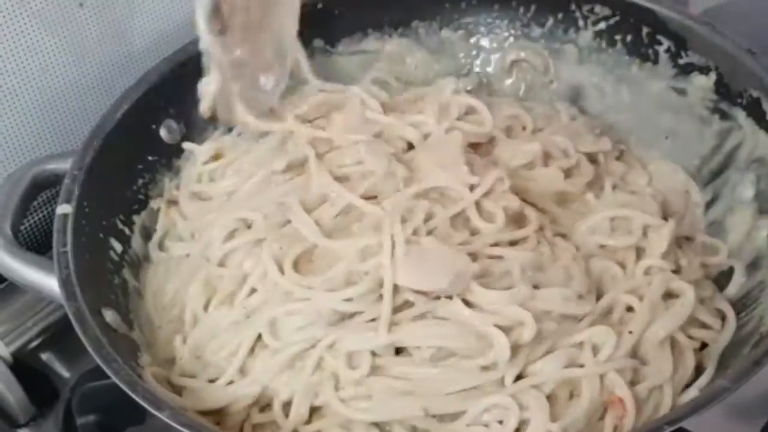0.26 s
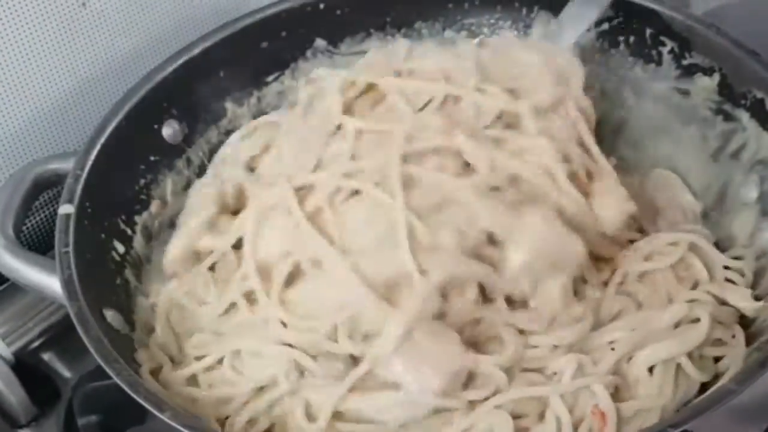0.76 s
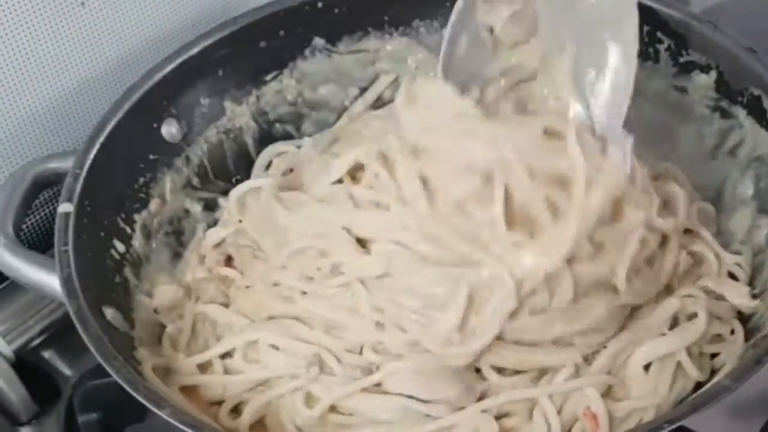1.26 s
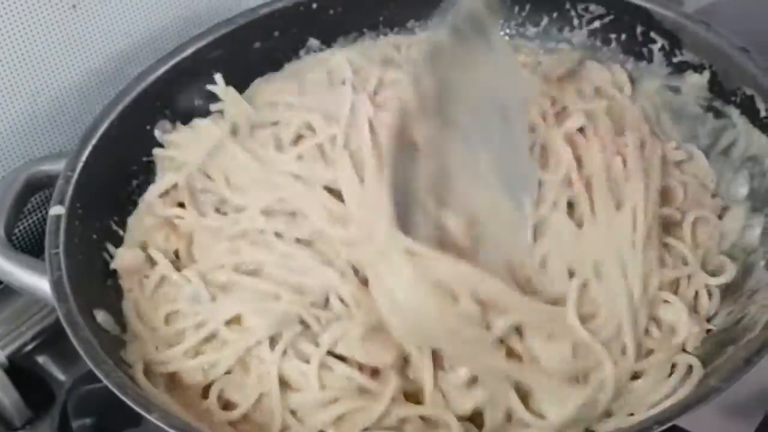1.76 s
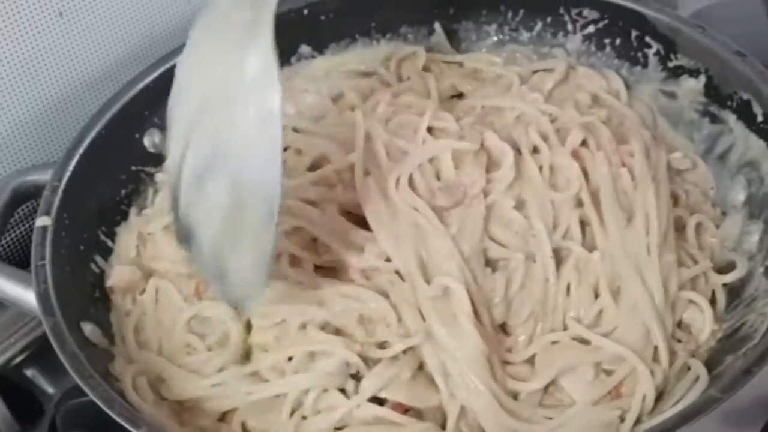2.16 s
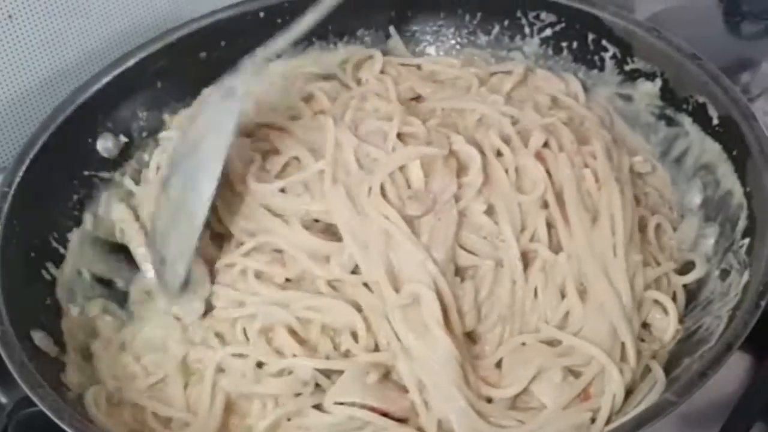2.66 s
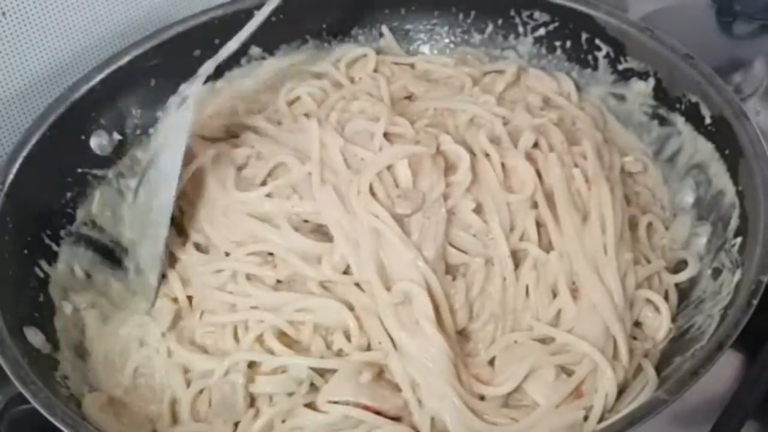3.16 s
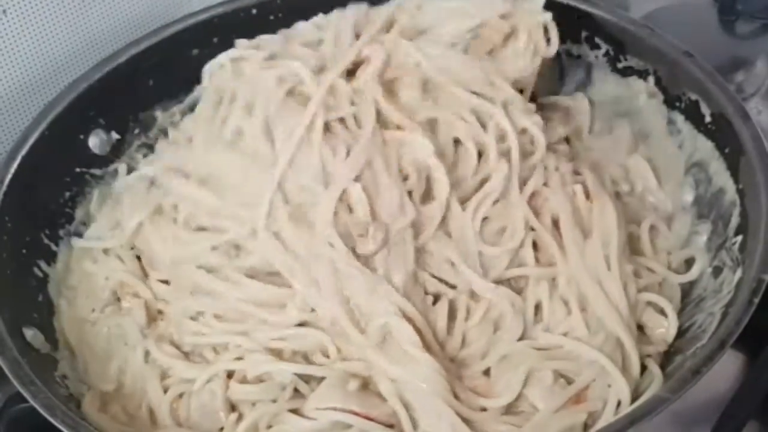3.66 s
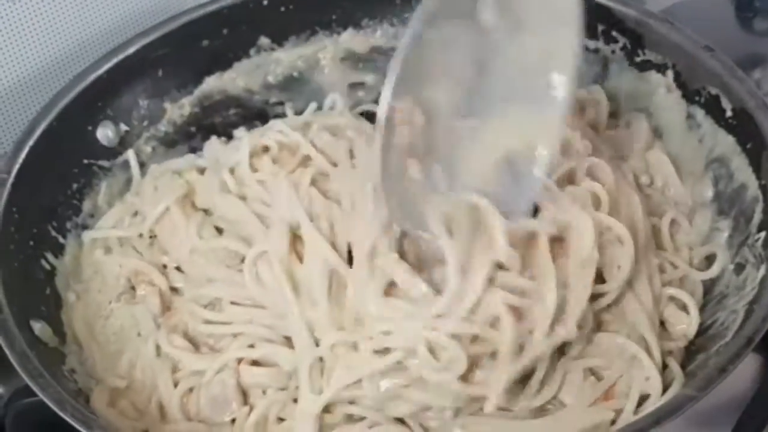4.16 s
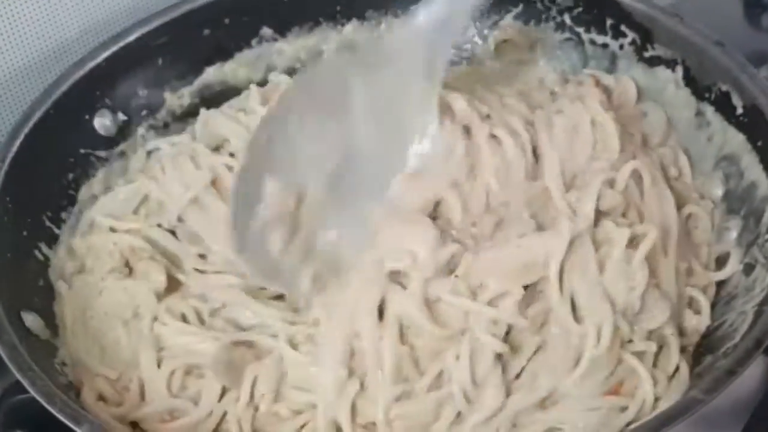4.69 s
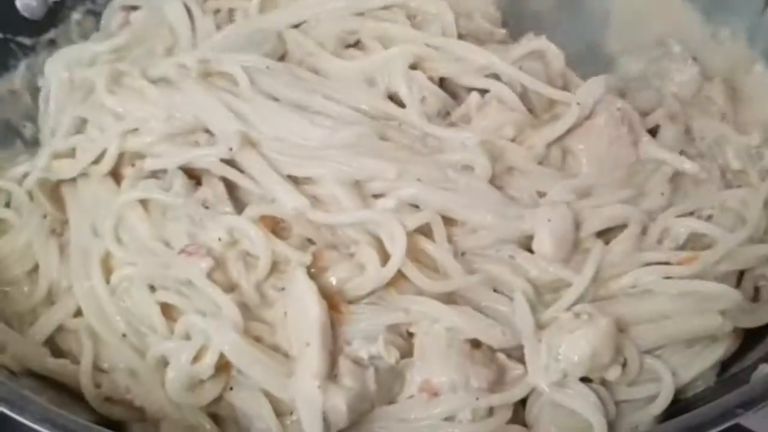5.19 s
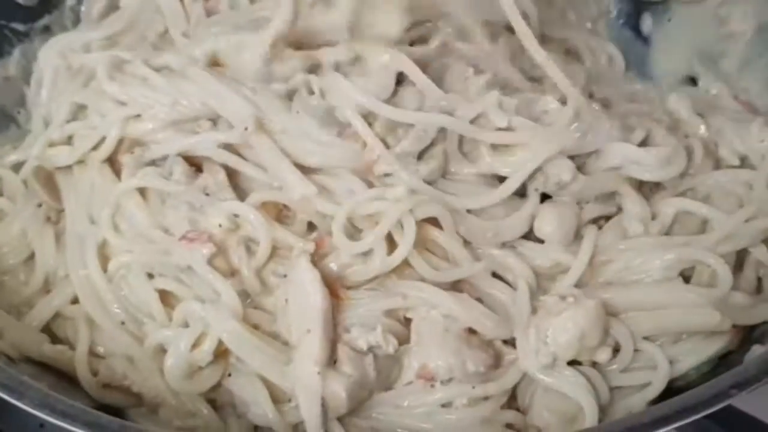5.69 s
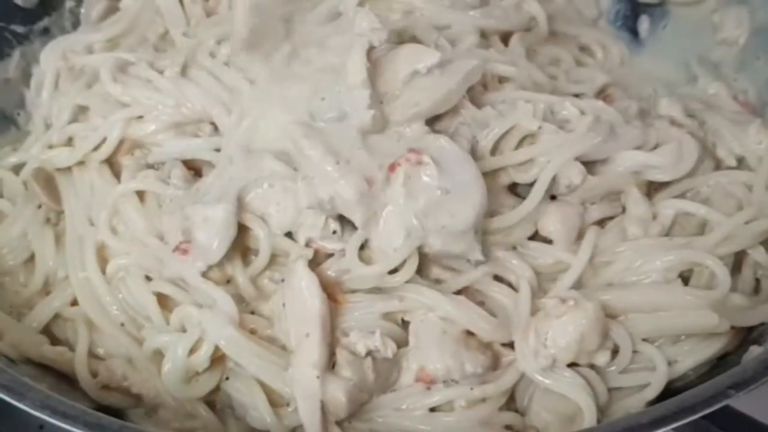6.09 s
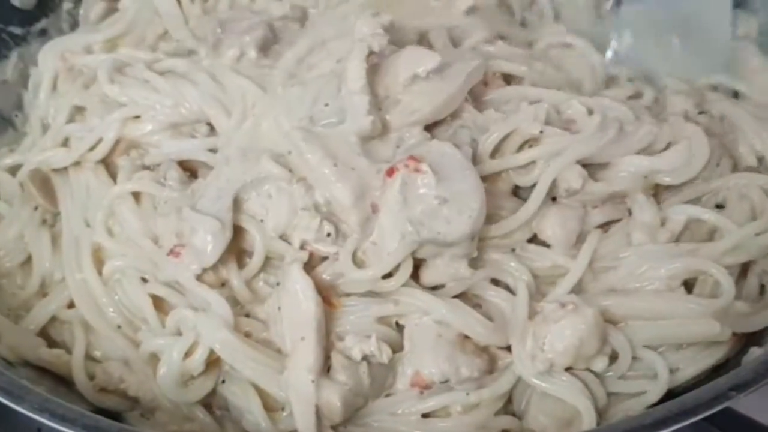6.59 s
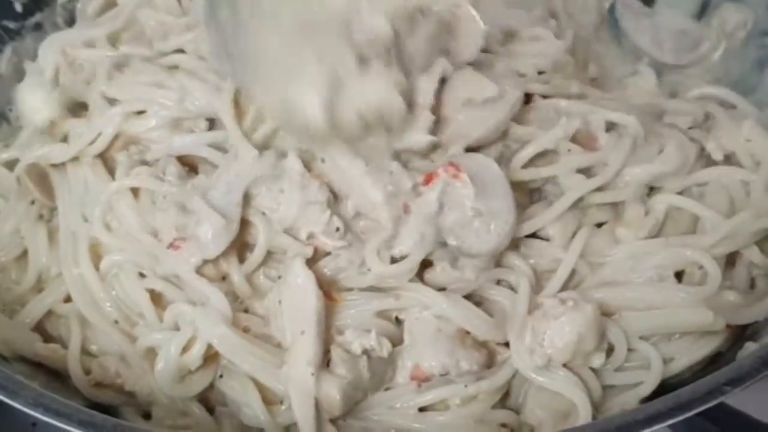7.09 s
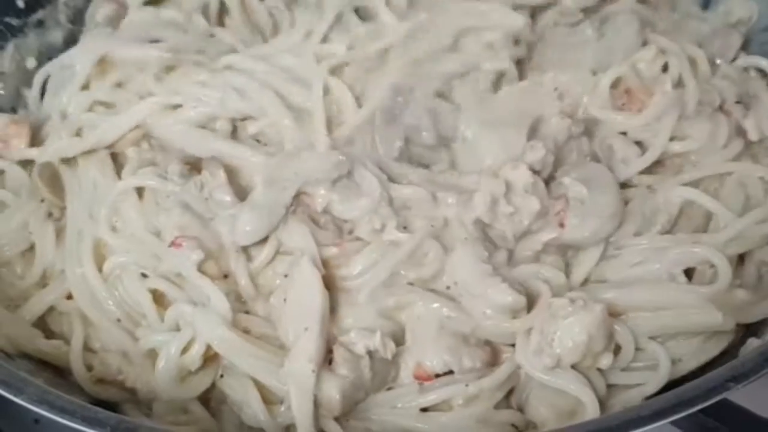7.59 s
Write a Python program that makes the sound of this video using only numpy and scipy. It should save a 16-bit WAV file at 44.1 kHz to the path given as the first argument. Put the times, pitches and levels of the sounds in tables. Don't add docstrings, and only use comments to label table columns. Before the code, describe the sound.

A spatula knocks, scrapes and rubs a nonstick pan while saucy pasta squelches softly and slaps, over a faint fridge hum in a small kitchen.

```python
import sys
import numpy as np
from scipy import signal
from scipy.fft import rfft, irfft, next_fast_len
from scipy.io import wavfile
from scipy.ndimage import uniform_filter1d

SR = 44100
rng = np.random.default_rng(int(sys.argv[2]) if len(sys.argv) > 2 else 0)


def level_to_linear(level):
    exponent = np.asarray(level, float) / 20
    return 10 ** exponent


def pcm_store(signal):
    levels = np.round(np.clip(np.atleast_2d(signal), -1, 1) * 32767)
    wavfile.write(sys.argv[1], SR, levels.astype(np.int16).T)


N = 346185
T = np.arange(N) / SR

# start in seconds, level in dB, bowl over rasp in dB, thud over rasp in dB.
KNOCKS = [(0.444, -22.5, -3, -9), (2.836, -17.5, 4, -2.5), (2.8694, -53.5, -4, 24), (3.1089, -26, -9, -8),
          (3.1225, -29, -5, -2), (3.377, -42, 5, -22), (3.42, -42, 8.5, -5), (3.518, -60, 1, -7),
          (4.349, -32.5, 4, 4.5), (4.9549, -25, -13, -18), (5.208, -44.5, 12, -2), (5.257, -53, -3, 0),
          (6.572, -46.5, 2, -2), (6.6693, -27.5, -4, -11.5)]
# start in seconds, level in dB, weight on the bowl in dB, fall T60 in seconds.
SWIPES = [(0.08, -32.5, -9.5, 0.41), (.35, -52, -20, .17), (0.471, -36.5, -1.5, 0.42),
          (1.66, -42, 6.5, 0.16), (1.99, -50.5, -16, 0.59), (2.31, -54.5, -14, 0.49),
          (2.611, -39.5, -5.5, 0.18), (2.832, -36, -3, 0.13), (3.108, -36, -3, 0.31),
          (3.271, -44.5, 2.5, 0.72), (3.324, -38, -5.5, 0.32), (3.396, -38.5, 2, 0.095),
          (3.55, -64.5, 15, 0.15), (4.345, -44, -5, 0.33), (5.21, -47, -1, 0.47), (5.415, -47, -15, 0.26),
          (5.44, -29.5, -1, 0.068), (6.651, -54.5, -2.1, 0.29), (6.72, -47, -1, 0.16),
          (7.498, -45.5, -31, 0.25)]
# peak in seconds, level in dB, weight on the bowl in dB, swell in seconds.
STROKES = [(1.627, -38, -3.5, 0.032), (2.76, -58, 6.5, 0.1), (2.95, -54.5, 7.5, 0.09),
           (3.49, -54, 5.5, 0.059), (4.72, -49.5, -19, 0.034), (5.029, -41.5, 4, 0.063),
           (5.087, -37, 1, 0.05), (5.126, -39.5, -2.5, 0.02), (5.375, -38, -2, 0.034),
           (5.48, -47, -2, 0.03), (7.14, -52.5, -9, 0.18)]
# start in seconds, level in dB, mode in Hz, T60 in seconds.
SPOT_BLOWS = [(0.4452, -14, 1260, 0.0033), (.474, -23.5, 2316, 0.021), (2.6, -33.5, 345, 0.094),
              (2.837, -22, 367, 0.069), (4.349, -28, 580, 0.0081), (4.955, -24, 378, 0.036),
              (5.258, -26.5, 266, 0.026), (5.426, -16, 1170, 0.031), (5.433, -8, 1200, 0.038)]
# start in seconds, level in dB, mode in Hz, length in seconds.
SPOT_RUBS = [(.575, -42, 1070, 0.029), (0.653, -44.5, 1014, 0.033), (.76, -47, 563, 0.069),
             (1.645, -39, 994, 0.037), (2.698, -46, 2470, 0.093), (2.71, -50, 3580, .11),
             (2.72, -49, 2160, 0.097), (2.86, -25, 120, 0.02), (2.88, -50, 3650, 0.19),
             (2.94, -33, 105.4, .02), (3.108, -23.5, 337, 0.02), (3.26, -33, 1043, .075),
             (3.385, -28.5, 1300, 0.032), (3.391, -25.5, 2310, 0.012), (3.436, -44, 3490, .05),
             (3.538, -38, 1043, 0.0089), (3.598, -48.5, 650, .08), (4.992, -37, 1017, 0.14),
             (5.012, -33, 2730, 0.019), (5.029, -31, 485, 0.026), (5.058, -31, 2430, 0.088),
             (5.09, -44, 1320, 0.025), (5.11, -36, 2290, .033), (5.344, -30, 2093, .038),
             (5.37, -32, 1530, .012), (5.461, -37.5, 1194, 0.018), (5.47, -31, 231, 0.034),
             (5.505, -44.5, 1230, 0.12), (6.701, -43, 793, .09), (7.198, -35.5, 3260, 0.0064)]
# start in seconds, level in dB, pitch in Hz, T60 in seconds.
TAPS = [(.4535, -27, 1100, .012), (0.462, -23, 1200, .015), (.473, -25.5, 1100, 0.023),
        (.484, -31, 1150, .03), (.797, -46, 657, 0.033), (.864, -45, 654, .025), (2.846, -14, 900, .012),
        (3.111, -22, 330, .025), (3.113, -25, 1100, 0.016), (3.122, -28, 1150, .025),
        (3.127, -21.5, 380, 0.027), (3.264, -39, 1060, .03), (3.296, -33, 1030, 0.035),
        (3.316, -33, 1040, .04), (3.328, -36, 420, 0.034), (3.381, -28, 1120, 0.011),
        (3.401, -27.5, 1250, .012), (3.42, -30, 1110, 0.011), (3.429, -32, 1200, .01),
        (3.488, -42, 1090, .03), (3.518, -35.5, 2500, .01), (4.349, -16.5, 450, 0.015),
        (4.355, -26, 900, 0.011), (4.372, -26.5, 300, 0.018), (4.962, -31, 1050, .02),
        (4.992, -34, 400, .02), (5.018, -33, 880, .03), (5.036, -28, 1100, 0.017), (5.038, -33, 1600, .02),
        (5.068, -30, 1050, .025), (5.087, -28, 1450, 0.017), (5.209, -30, 900, .01),
        (5.358, -29.5, 2200, .02), (5.368, -25, 2060, .015), (5.378, -24.5, 4300, .01),
        (5.433, -20.5, 700, 0.019), (5.4435, -15, 1200, .022), (5.467, -28, 1200, 0.045),
        (5.476, -28, 1200, .03), (5.51, -36.5, 1200, .04), (.4455, -18, 500, .008), (1.6, -39, 900, .015),
        (1.625, -38, 1000, .015), (1.652, -33, 800, 0.018), (1.659, -34, 1690, .02), (1.671, -31, 950, .02),
        (1.684, -36, 700, .015), (5.045, -29, 480, .025), (6.668, -29, 910, 0.017),
        (7.2005, -39, 3280, .012)]
# frequency in Hz, level in dB, T60 in seconds.
THUD_MODES = [(123, -3, 0.45), (245.7, -1, 0.12), (378, -2, 0.022), (473.6, -7.5, 0.11), (615, -12, 0.046)]
# frequency in Hz, level in dB, T60 in seconds.
BOWL_MODES = [(840, -11, 0.14), (930, -9, 0.053), (1082, -6.5, 0.034), (1170, -5.5, 0.018),
              (1330, -15.5, 0.16), (1447, -10.5, 0.11), (1598, -10.5, 0.093), (1814, -14, 0.086),
              (1985, -13.5, 0.054)]
# frequency in Hz, level in dB, T60 in seconds.
RASP_MODES = [(2300, -14, 0.18), (2470, -9, 0.18), (2780, -8.5, 0.07), (3560, -13, 0.059),
              (4140, -12, 0.04), (4890, -11.5, 0.061), (5200, -5, 0.018), (5830, -8.5, .04),
              (6200, -7, 0.022), (6790, -11, 0.099)]
# frequency in Hz, density in dB per Hz.
GRIT_SPECTRUM = [(880, -13.5), (1500, -17), (1700, -19.5), (1850, -5.5), (3990, -8), (6530, -4.5),
                 (8850, -13), (13100, -13), (14500, -32)]
# time in seconds, pitch in Hz, level in dB, pitch wander from 0 to 1.
SQUEAK = [(2.86, 915, -80, .02), (2.9, 920, -58, .03), (2.97, 945, -55, .03), (3.05, 960, -56, .03),
          (3.1, 965, -62, .02), (3.185, 920, -66, .006), (3.2, 912, -45, .006), (3.29, 910, -48, .006),
          (3.32, 905, -80, .006)]
# level in dB, from the fundamental up.
SQUEAK_HARMONICS_DB = [-11, 0, -15, -13]
# time in seconds, stirring level in dB.
STIRRING = [(0.0, -57.5), (0.7, -56.5), (1.2, -61), (1.64, -53), (2.21, -64), (2.75, -63.5), (3.3, -59.5),
            (3.55, -58), (4.25, -62), (4.5, -54), (4.8, -65.5), (5.12, -56.5), (5.31, -50), (5.68, -63),
            (6.43, -65), (6.82, -48), (7.2, -48), (7.33, -61)]
# frequency in Hz, density in dB per Hz.
WET_SPECTRUM = [(590, -33), (1000, -1), (1320, -6), (1670, -2), (1870, -2.5), (3790, -1), (8860, -4.5),
                (11600, -1.5), (14500, -5.5)]
# start in seconds, level in dB, pitch in Hz.
TICKS = [(0.748, -42.5, 6300), (0.819, -42, 5770), (0.8426, -36, 4540), (0.9894, -47, 7790),
         (1.109, -52, 6370), (1.3526, -40, 6330), (1.422, -45, 9330), (1.7295, -42, 3050),
         (1.7687, -37, 8400), (1.98, -45, 3350), (2.294, -40.5, 10530), (2.349, -43, 9250),
         (3.264, -42, 5600), (3.929, -43.5, 9760), (4.2572, -46, 5670), (4.2832, -40, 6700),
         (4.4185, -40, 6310), (4.562, -41, 3940), (4.589, -42, 4330), (5.675, -38.5, 10800),
         (6.0247, -44, 5980), (6.103, -43, 6160), (6.4625, -45, 11000), (4.284, -40, 11800),
         (6.9713, -37, 7800), (7.201, -31.5, 3180), (7.2694, -39, 5300), (7.457, -38, 6250),
         (7.504, -39, 2560), (7.7189, -43.5, 6200)]
# start in seconds, level in dB.
KNOCK_CRACKS = [(2.6, -28.5), (2.836, -28), (3.1083, -18.5), (4.3485, -31.5), (4.955, -21), (6.665, -44)]
# start in seconds, level in dB, centre in Hz, fade in seconds.
SWISHES = [(.068, -19.5, 6160, 0.046), (0.41, -43, 6400, .02), (1.61, -30.5, 5700, 0.028),
           (3.31, -35, 6000, .02), (5.36, -23.5, 3900, 0.016), (5.07, -29.5, 4100, 0.05),
           (7.495, -36.5, 11000, 0.025), (4.348, -25, 6000, 0.012), (3.11, -15.5, 6800, 0.012),
           (4.35, -32, 950, .014), (5.207, -39, 1300, 0.014), (.68, -38.5, 1300, 0.01),
           (1.6, -37, 350, 0.04)]
# start in seconds, level in dB, pitch
# in Hz.
NARROW_TICKS = [(.624, -46, 6080), (1.0526, -50, 4160), (1.1089, -46, 6450), (1.2267, -49, 11000),
                (1.295, -44, 3950), (1.3993, -50, 3330), (1.4227, -46, 5200), (1.4686, -51, 5040),
                (1.536, -43, 5790), (1.6098, -34, 5520), (1.635, -36, 3100), (1.6577, -38, 5500),
                (1.8443, -51, 3770), (1.9545, -49, 6930), (2.0049, -45, 3020), (2.1296, -50, 5000),
                (2.184, -47, 10900), (2.5956, -35, 7080), (2.6006, -32.5, 4800), (2.605, -36, 10800),
                (2.613, -36, 5600), (2.7133, -45, 5640), (2.836, -24, 5200), (3.3129, -31, 4850),
                (3.325, -33, 5600), (3.6751, -48, 11800), (3.8841, -50, 6010), (4.178, -50, 10540),
                (4.2284, -51, 6680), (4.2573, -44, 5670), (4.3491, -25, 5390), (4.455, -48, 8200),
                (4.6908, -48, 4890), (4.955, -30, 4800), (5.6315, -46, 4520), (5.9703, -50, 2800),
                (6.1349, -49, 9040), (6.5724, -44.5, 5060), (7.1182, -38.5, 5860), (7.14, -40, 5000),
                (7.155, -39, 7000), (7.424, -47, 10100)]
# frequency in Hz, level in dB.
HUM_LINES = [(59.2, -49.5), (118.4, -60.5), (236.9, -67.5)]
HUM_WOBBLE = [0.065, 0.55, 0.21]
# time in seconds, level in dB.
BACKGROUND_LEVEL = [(0.0, -45), (0.8, -45.5), (5.57, -46), (5.79, -49), (6.67, -47.5), (7.0, -44.5),
                    (7.85, -44.5)]
# centre in Hz, width in Hz, level in dB.
VENT_BANDS = [(1536, 76, -72.5), (1764, 73, -70.5), (644, 22, -72.5)]
# frequency in Hz, density in dB per Hz.
AIR_SPECTRUM = [(160, -19), (280, -1), (371, 4), (409, -16.5), (475, 2), (533, -12), (793, 2), (1240, -36),
                (1480, -5), (1750, -2.5), (1900, -23), (2830, -31.5), (4000, -13), (4340, -19.5),
                (14500, -24.5)]
# frequency in Hz, density in dB per Hz.
RUMBLE_SPECTRUM = [(25, -29.5), (45, -10.5), (85, 0), (120, 3.5), (165, -8), (235, -6), (290, -10.5),
                   (420, -34.5)]
# frequency in Hz, left minus right in dB.
PORTS = [(60, 1.5), (110, 1), (200, 5), (380, -3), (700, 5.5), (1290, 0.5), (2380, 2), (4400, -1.5),
         (8120, -0.5), (15000, -0.5)]

KNOCK_RISE_S, KNOCK_T60_S, SWIPE_RISE_S = 0.00065, 0.06, 0.016
EASE_PER_SWELL = 5.4
THUD_DB, THUD_PER_WEIGHT = -9.5, 0.79
BLOW_S, RUB_T60_S, RUB_CYCLES = 0.0018, 0.024, 23
TAP_CRACK_DB, TAP_CRACK_S, TAP_SPLIT = -16, 0.0025, 0.054
BODY_DB, BODY_PER_DB, CALM_DB = -1.5, -0.5, -60
TICK_FADE_S, KNOCK_CRACK_HZ, KNOCK_CRACK_FADE_S = 0.007, 11100, 0.017
STRAY_DB, STRAY_SPREAD_DB, STRAY_HZ = -47.5, 1, 7500
NARROW_TICK_CYCLES, NARROW_TICK_FADE_S = 34, 0.0048
AIR_DB, RUMBLE_DB = -65.5, -56.5
ROOM_T60_S, ROOM_DB, LAG_S = 0.28, -11, 0.00007


def unit(x):
    return x / np.sqrt(np.mean(x ** 2))


def shape(x, table, power=1):
    hz, db = np.transpose(table)
    n = next_fast_len(x.shape[-1], True)
    log_hz = np.log(np.fft.rfftfreq(n, 1 / SR) + 1)
    gain = level_to_linear(power * np.interp(log_hz, np.log(hz), db))
    return irfft(rfft(x, n) * gain, n)[..., :x.shape[-1]]


def mode(x, hz, t60):
    r = 1000 ** (-1 / (t60 * SR))
    w = 2 * np.pi * hz / SR
    gain = np.sqrt(2 * (1 - r * r)) * r * np.sin(w)
    return signal.lfilter([0, gain], [1, -2 * r * np.cos(w), r * r], x)


def walk(rate_hz):
    k = int(SR / rate_hz)
    steps = np.repeat(rng.standard_normal(N // k + 1), k)
    return unit(uniform_filter1d(uniform_filter1d(steps, k), k)[:N])


def pair(alike_hz):
    mid, side = rng.standard_normal((2, N))
    side = shape(side, [(alike_hz / 20, -26), (alike_hz, 0)])
    return mid + side * np.array([[1], [-1]])


def place(out, start_s, sound):
    i = int(start_s * SR)
    out[..., i:i + sound.shape[-1]] += sound


def drag(db, weight_db):
    return db, db + weight_db, db + THUD_DB + THUD_PER_WEIGHT * weight_db


def touches():
    knocks = [(s, db, db + bowl, db + thud, KNOCK_RISE_S, KNOCK_T60_S) for s, db, bowl, thud in KNOCKS]
    swipes = [(s, *drag(db, weight), SWIPE_RISE_S, fall) for s, db, weight, fall in SWIPES]
    strokes = [(s, *drag(db, weight), swell, EASE_PER_SWELL * swell) for s, db, weight, swell in STROKES]
    return knocks + swipes + strokes


def rough_noise(alike, grain):
    common = alike * rng.standard_normal(N)
    apart = np.sqrt(1 - alike ** 2) * rng.standard_normal((2, N))
    return unit((common + apart) * grain)


def contacts(rough_db=2, slip_db=2.5, spot_db=3, detune=0.024):
    out = np.zeros((2, N + SR))
    stutter = level_to_linear(slip_db * np.clip(walk(120), -2, 2))
    grain = level_to_linear(rough_db * np.minimum(rng.exponential(size=N), 4))
    noises = [rough_noise(alike, grain) for alike in (0.6, 0.7, 0.93)]
    grit = unit(shape(noises[0], GRIT_SPECTRUM))
    groups = list(zip((-12, -4, -2), noises, (RASP_MODES, BOWL_MODES, THUD_MODES)))
    for s, *levels_db, rise, fall in touches():
        spot = rng.standard_normal((3, 12, 2))
        i = max(int((s - 3 * rise) * SR), 0)
        j = min(int((s + fall + 0.17) * SR), N)
        t = T[i:j] - s
        swell = np.exp(-(t / rise) ** 2)
        decay = 1000 ** (-np.maximum(t, 0) / fall)
        force = stutter[i:j] * np.where(t < 0, swell, decay)
        out[:, i:j] += level_to_linear(levels_db[0] - 3.0) * force * grit[:, i:j]
        for level_db, (trim_db, noise, modes), chances in zip(levels_db, groups, spot):
            push = force * noise[:, i:j]
            for (hz, mode_db, t60), (gain, shift) in zip(modes, chances):
                db = level_db + trim_db + mode_db + spot_db * gain
                out[:, i:j] += level_to_linear(db) * mode(push, hz * (1 + detune * shift), t60)
    return out[:, :N]


def rings():
    out = np.zeros(N)
    t = T[:SR // 2]
    blows = [(s, db, hz, BLOW_S, t60) for s, db, hz, t60 in SPOT_BLOWS]
    rubs = [(s, db, hz, length, RUB_T60_S + RUB_CYCLES / hz) for s, db, hz, length in SPOT_RUBS]
    for s, db, hz, drive_s, t60 in blows + rubs:
        window = np.sqrt(np.maximum(np.sin(np.pi * np.minimum(t / drive_s, 1)), 0))
        chatter = rng.standard_normal(len(t)) * window
        push = 4 * np.cos(2 * np.pi * hz * t) * (t < drive_s) * (drive_s < 0.006)
        ring = mode(chatter + push, hz, t60)
        place(out, s, level_to_linear(db) * ring / np.abs(ring).max())
    return out


def taps():
    out = np.zeros(N)
    t = T[:SR // 8]
    for s, db, hz, t60 in TAPS:
        crack = rng.standard_normal(len(t)) * np.exp(-t / TAP_CRACK_S)
        lower = np.sin(2 * np.pi * hz * t)
        upper = 0.4 * np.sin(2 * np.pi * hz * (1 + TAP_SPLIT) * t)
        ring = (lower + upper) * 1000 ** (-t / t60)
        place(out, s, level_to_linear(db) * (ring + level_to_linear(TAP_CRACK_DB) * crack))
    return out


def squeak(rough=20):
    s, hz, db, wander = np.transpose(SQUEAK)
    wander = np.interp(T, s, wander)
    phase = 2 * np.pi * np.cumsum(np.interp(T, s, hz) * (1 + wander * walk(150))) / SR
    tone = np.zeros(N)
    for k, harmonic_db in enumerate(SQUEAK_HARMONICS_DB, 1):
        tone += level_to_linear(harmonic_db) * np.sin(k * phase) * (1 + rough * wander * walk(100))
    return tone * level_to_linear(np.interp(T, s, db, -140, -140))


def squelch(grain_db=3, flicker_db=1.0, snap_db=2.0):
    s, db = np.transpose(STIRRING)
    grains = pair(1450) * level_to_linear(grain_db * np.minimum(rng.exponential(size=N), 4))
    crackle = unit(shape(grains, WET_SPECTRUM))
    snaps = np.clip(walk(110), 0, 3) ** 0.69
    flow = level_to_linear(np.interp(T, s, db) + flicker_db * walk(20) + snap_db * snaps)
    body_spectrum = [(150, -17.5), (350, 5.5), (900, -2.5), (2000, -7.5), (3500, -21.5)]  # Hz, dB per Hz
    body = unit(shape(pair(730), body_spectrum))
    body_db = np.interp(T, s, BODY_DB + BODY_PER_DB * (db - CALM_DB))
    return flow * (crackle + level_to_linear(body_db) * body)


def strays(count=70):
    s, size, pitch = rng.random((count, 3)).T
    db = STRAY_DB + STRAY_SPREAD_DB * (2 * size - 1)
    hz = STRAY_HZ * 2 ** (1.6 * pitch - 0.8)
    return list(zip(s * (N / SR - 0.2), db, hz))


def wet_bursts():
    out = np.zeros((2, N))
    t = T[:SR // 8]
    ticks = [(*row, TICK_FADE_S) for row in TICKS + strays()]
    cracks = [(*row, KNOCK_CRACK_HZ, KNOCK_CRACK_FADE_S) for row in KNOCK_CRACKS]
    for s, db, hz, fade in ticks + cracks + SWISHES:
        envelope = np.exp(-t / fade) * np.minimum(4 * t / fade, 1)
        burst = rng.standard_normal((2, len(t))) * envelope
        t60 = 4.2 / hz
        wet = mode(mode(burst, hz, t60), hz, t60) + 0.21 * burst
        place(out, s, level_to_linear(db) * wet / np.abs(wet).max())
    return out


def narrow_ticks():
    out = np.zeros((2, N))
    t = T[:SR // 16]
    for s, db, hz in NARROW_TICKS:
        burst = rng.standard_normal((2, len(t))) * np.exp(-t / NARROW_TICK_FADE_S)
        pop = mode(burst, hz, NARROW_TICK_CYCLES / hz)
        place(out, s, level_to_linear(db) * pop / np.abs(pop).max())
    return out


def kitchen():
    hum = np.zeros(N)
    for (hz, db), wobble in zip(HUM_LINES, HUM_WOBBLE):
        line = np.sin(2 * np.pi * hz * T) + wobble * mode(rng.standard_normal(N), hz, 0.083)
        hum += level_to_linear(db + 4.0 + 1.04 * walk(9)) * line
    vent = np.zeros((2, N))
    for hz, width_hz, db in VENT_BANDS:
        vent += level_to_linear(db + 1.5 * walk(8)) * mode(pair(1200), hz, 2.2 / width_hz)
    air = level_to_linear(AIR_DB) * unit(shape(pair(1200), AIR_SPECTRUM))
    rumble = level_to_linear(RUMBLE_DB) * unit(shape(pair(1400), RUMBLE_SPECTRUM))
    s, db = np.transpose(BACKGROUND_LEVEL)
    return (hum + vent + air + rumble) * level_to_linear(np.interp(T, s, db + 48.5))


def room(x):
    t = T[:SR // 2]
    paths = pair(900)[:, :len(t)] * 1000 ** (-t / ROOM_T60_S) * (t > 0.001)
    paths = level_to_linear(ROOM_DB) * paths / np.sqrt(np.sum(paths ** 2) / 2)
    paths[0, 0] += 1
    paths[1, int(LAG_S * SR)] += 1
    return signal.fftconvolve(x, paths, axes=1)[:, :N]


def scene():
    pan = contacts() + rings() + squeak() + taps()
    return room(pan) + squelch() + wet_bursts() + narrow_ticks() + kitchen()


def roll_off(x):
    return signal.sosfilt(signal.butter(12, 15810, fs=SR, output="sos"), x)


def record(dry):
    left = shape(dry[0], PORTS, 0.19)
    right = shape(dry[1], PORTS, -0.92)
    return roll_off(np.array([left, right]))


dry = scene()
out = record(dry)
pcm_store(out)
```